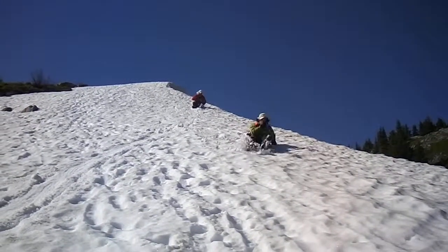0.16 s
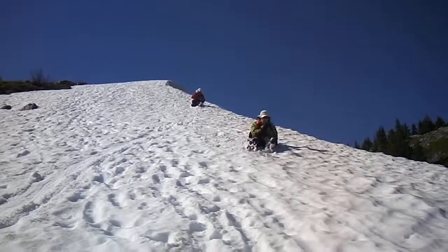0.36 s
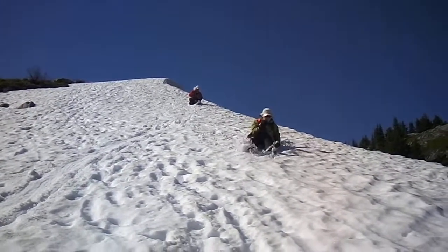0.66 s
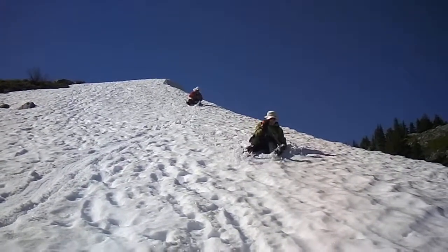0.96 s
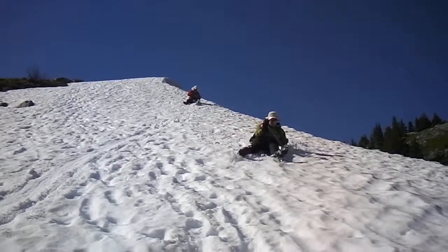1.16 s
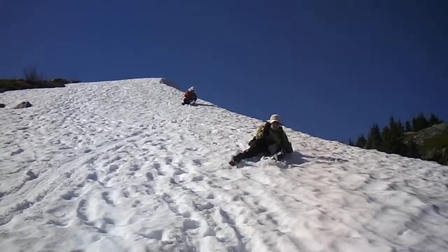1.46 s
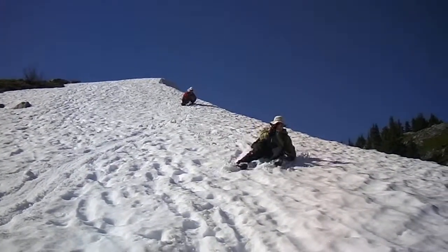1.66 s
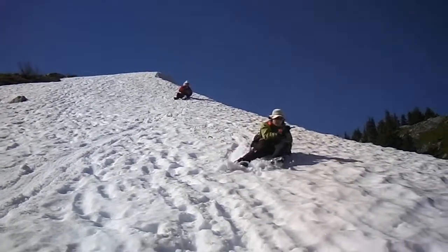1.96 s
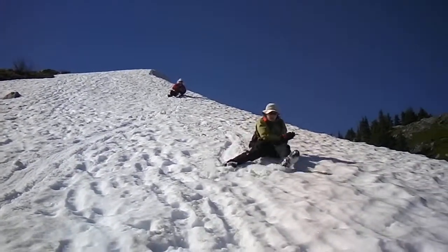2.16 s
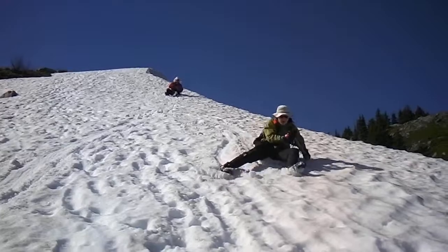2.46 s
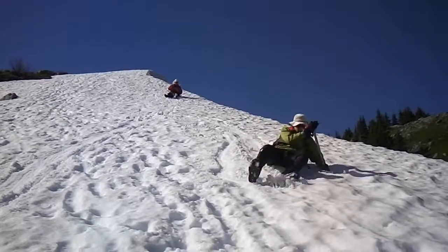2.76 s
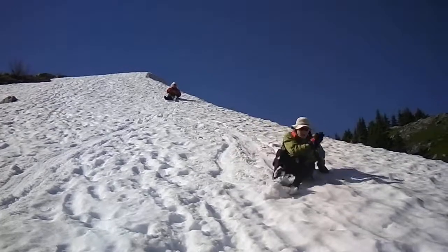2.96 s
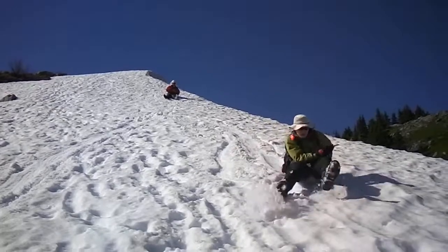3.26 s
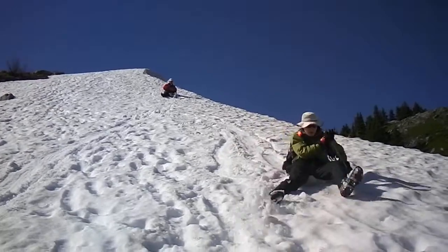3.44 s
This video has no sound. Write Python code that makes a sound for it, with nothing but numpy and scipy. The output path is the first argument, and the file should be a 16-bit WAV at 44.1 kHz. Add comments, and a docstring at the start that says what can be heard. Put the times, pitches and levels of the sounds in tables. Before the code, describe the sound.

A person slides down coarse snow with a grainy hiss, while nylon cloth swishes close by.

```python
"""Sliding down spring snow

A person slides towards a camera: coarse snow grains hiss, thrown crystals patter, a heel crunches in.
Close to the microphone cloth, most likely nylon, swishes: the faster it rubs, the brighter it sounds.
Slow rubbing sticks and slips in short rasps. Light air rumbles on the two microphone ports."""
import sys
import numpy as np
from scipy import signal
from scipy.fft import rfft, irfft, next_fast_len
from scipy.io import wavfile
from scipy.ndimage import uniform_filter1d, map_coordinates

SR = 44100
rng = np.random.default_rng(int(sys.argv[2]) if len(sys.argv) > 2 else 0)


def generate_wav(sig):
    """Save sig (samples, or channels by samples) to the path in sys.argv[1] as 16-bit PCM at SR."""
    pcm = np.round(np.clip(np.atleast_2d(sig).T, -1, 1) * 32767).astype(np.int16)
    wavfile.write(sys.argv[1], SR, pcm)


N = 158760  # 3.6 s


def amp(db):
    """Decibels to gain."""
    return 10 ** (np.asarray(db) / 20)


def unit(x):
    """Scale to rms 1."""
    return x / np.sqrt(np.mean(x ** 2) + 1e-20)


def along(points, hz):
    """Interpolate (frequency [Hz], value) rows on a log axis."""
    knots_hz, values = np.transpose(points)
    return np.interp(np.log(hz + 1), np.log(knots_hz + 1), values)


def lift_db(resonances, hz):
    """Summed bell curves of (centre [Hz], width [Hz], lift [dB]) rows."""
    return sum(db * 0.5 ** ((2 * (hz - centre) / width) ** 2) for centre, width, db in resonances)


def curve(rows):
    """One value per sample from (time [s], value) rows."""
    return np.interp(np.arange(N) / SR, *np.transpose(rows))


def bursts(rows):
    """A rounded swell per (start [s], length [s], level [dB]) row."""
    t = np.arange(N) / SR
    envelope = np.zeros(N)
    for start_s, length_s, db in rows:
        progress = np.clip((t - start_s) / length_s, 0, 1)
        envelope += amp(db) * np.abs(np.sin(np.pi * progress)) ** 0.53
    return envelope


def wobble(knots_per_s):
    """Smooth random curve."""
    return map_coordinates(rng.standard_normal(4000), [np.arange(N) * knots_per_s / SR], mode="wrap")


def filtered(x, response):
    """Apply a complex frequency response."""
    size = next_fast_len(N + 8192)
    hz = np.fft.rfftfreq(size, 1 / SR)
    return irfft(rfft(x, size) * response(hz), size)[..., :N]


def grainy(per_s, spread_db, share):
    """Two independent streams of tiny impacts on noise; share is the impacts' part of the power."""
    hits = (rng.random((2, N)) < per_s / SR) * rng.choice([-1, 1], (2, N))
    sizes = amp(spread_db * np.minimum(rng.exponential(size=(2, N)), 4))
    bed = rng.standard_normal((2, N))
    return np.sqrt(share) * unit(hits * sizes) + np.sqrt(1 - share) * bed


def stereo(pair, spectrum):
    """Colour two streams and mix them to partly alike left and right, rms 1."""
    # left-right likeness (frequency [Hz], correlation [-])
    likeness = [(60, 1), (300, .9), (2000, 0.91), (5000, 0.71), (9000, 1), (14000, 0.54)]

    def response(hz):
        angle = np.arccos(np.clip(along(likeness, hz), -1, 1)) / 2
        return amp(along(spectrum, hz)) * [np.cos(angle), np.sin(angle)]
    mid, side = filtered(pair, response)
    return unit(np.array([mid + side, mid - side]))


def patchy(x, depth_db):
    """Short patches of random gain in time and frequency, rms 1."""
    spectra = signal.stft(x, nperseg=256)[2]
    field = rng.standard_normal(spectra.shape[1:])
    field = uniform_filter1d(field, size=8, axis=0)
    field = uniform_filter1d(field, size=10, axis=1)
    gain = amp(depth_db * unit(field))
    return unit(signal.istft(spectra * gain, nperseg=256)[1][:, :N])


def slide():
    """Snow grains break under the body; bumps in the slope make the hiss uneven."""
    # hiss envelope (time [s], level [dB])
    levels = [(0, -41.5), (.09, -39.5), (.16, -38), (.6, -35.5), (1.2, -35.5), (1.8, -35.5), (1.9, -37),
              (1.97, -35.5), (2.12, -33.5), (2.19, -35), (2.26, -37), (2.38, -34), (2.47, -33.5),
              (2.53, -36), (2.64, -33.5), (2.77, -36.5), (2.9, -35), (2.95, -32.5), (3.06, -34),
              (3.22, -31), (3.31, -33), (3.4, -31), (3.52, -32.5), (3.6, -31.5)]
    # snow spectrum (frequency [Hz], relative density [dB])
    snow = [(40, -50), (90, -34), (150, -12), (250, -6), (450, -2), (1100, -2), (2300, 1.5), (4000, 0.5),
            (6800, -4.5), (10500, -5), (12500, -7.5), (14000, -15), (15200, -30)]
    grains = grainy(per_s=8000, spread_db=3, share=0.35)
    hiss = patchy(stereo(grains, snow), depth_db=1.0)
    return hiss * amp(curve(levels))


def air():
    """Moving air rumbles in lumps, different on each port."""
    # air on the ports (time [s], level [dB])
    levels = [(0, -52), (.08, -57), (.13, -43), (.23, -69), (.35, -54.5), (.52, -55.5), (.65, -67),
              (1.05, -66), (1.14, -49.5), (1.38, -54), (1.51, -47), (1.7, -55.5), (1.83, -50.5),
              (1.93, -69.5), (3.6, -72)]
    # rumble spectrum (frequency [Hz], relative density [dB])
    spectrum = [(20, 10), (50, -1.5), (130, 10), (220, 4), (500, -33), (2000, -60)]
    rumble = filtered(rng.standard_normal((2, N)), lambda hz: amp(along(spectrum, hz)))
    lumps_db = 2.9 * np.tanh([wobble(30.54), wobble(29.5)])
    return unit(rumble * amp(lumps_db)) * amp(curve(levels))


def swish():
    """Threads tick past each other at a rate set by the speed; fixed resonances colour the result."""
    # cloth strokes, one curve each (time [s], speed [m/s], level [dB])
    strokes = [
        [(.12, 2.2, -50), (.16, 1.8, -37), (.18, 1.2, -31.5), (.21, 0.68, -37.5), (.25, 0.67, -43)],
        [(.47, 0.48, -42), (.62, 0.44, -38.5), (.68, 0.58, -32.5), (.73, 0.56, -34.5), (.78, .75, -30.5),
         (.83, 0.64, -31), (.93, 0.88, -28), (1.02, 1.01, -27), (1.08, 1.48, -25), (1.16, 1.8, -28),
         (1.2, 1.33, -25), (1.265, 1.9, -25), (1.295, 1.85, -34), (1.34, 1.44, -33.5), (1.4, 1.6, -37)],
        [(1.405, 2, -40), (1.435, 1.9, -28.5), (1.48, 1.26, -26.5), (1.55, 1.17, -27), (1.59, 1.6, -23.5),
         (1.63, 2, -27), (1.68, 2.2, -23.5), (1.71, 2.3, -24), (1.775, 1.86, -23), (1.808, 1.3, -25.5),
         (1.822, 0.92, -29.5), (1.846, 0.94, -32.5), (1.858, .9, -53)],
        [(2.785, 4.2, -48), (2.812, 1.2, -35), (2.835, 1.35, -30), (2.86, 1.5, -45)],
    ]
    # cloth colour (frequency [Hz], gain [dB])
    cloth = [(100, -25), (400, -0.5), (900, -1.5), (2000, 4), (5000, 1), (7000, -0.5), (8300, 2),
             (10500, 3), (12500, 2.5), (14000, -6.5), (15200, -50)]
    # resonances between cloth and camera body (centre [Hz], width [Hz], lift [dB])
    hollows = [(1050, 140, 3), (1390, 140, 3), (1750, 150, 3), (2140, 220, 4), (2780, 320, 5),
               (3250, 200, 3), (3790, 300, 7.5), (4740, 380, 7), (5600, 260, 4), (6030, 240, 4),
               (6980, 380, 6), (8530, 240, 3.5), (9250, 240, 4), (9630, 240, 3.5), (10480, 400, 4),
               (11620, 240, 2.5)]
    threads_per_m, width_oct = 4090, 0.48
    skirt_below_db, skirt_above_db = -8, -12.5
    ticks = grainy(per_s=8000, spread_db=2.5, share=0.44)
    rub = patchy(stereo(ticks, spectrum=[(20, 0), (20000, 0)]), depth_db=1.15)
    hz, t, spectra = signal.stft(rub, SR, nperseg=512, noverlap=384)
    colour = amp(along(cloth, hz) + lift_db(hollows, hz))
    gain = np.zeros(spectra.shape[1:])
    for stroke in strokes:
        times_s, speed_m_s, db = np.transpose(stroke)
        tick_hz = threads_per_m * np.interp(t, times_s, speed_m_s)
        octaves = np.log2((hz[:, None] + 1) / tick_hz)
        peak_power = np.exp(-0.5 * (octaves / width_oct) ** 2)
        skirt = amp(np.interp(octaves, [-1, 1], [skirt_below_db, skirt_above_db]))
        shape = colour[:, None] * np.sqrt(peak_power + skirt ** 2)
        level = np.interp(t, times_s, amp(db), left=0, right=0)
        gain += shape / np.sqrt(np.mean(shape ** 2, axis=0)) * level
    swishes = signal.istft(spectra * gain, SR, nperseg=512, noverlap=384)[1][:, :N]
    flicker_db = 0.98 * wobble(70)
    return swishes * amp(flicker_db)


def judder():
    """Slowly rubbing cloth sticks and slips in short, hollow rasps."""
    # cloth catches (start [s], length [s], level [dB])
    catches = [(.272, 0.075, -31.5), (.356, 0.026, -34.5), (.392, 0.031, -36.5), (.43, 0.023, -35.5)]
    # rasp spectrum (frequency [Hz], relative density [dB])
    spectrum = [(200, -23), (550, -10), (1100, -5.5), (2100, -0.5), (2900, -1.5), (3400, -22), (6000, -10),
                (12000, -45)]
    # resonances the judder rings (centre [Hz], width [Hz], lift [dB])
    rings = [(565, 65, 9), (736, 90, 10), (1092, 110, 13.5), (1730, 110, 7.5), (2140, 150, 10),
             (2700, 150, 6.5)]
    rasp = stereo(grainy(per_s=1200, spread_db=1, share=0.45), spectrum)
    hollow_rasp = filtered(rasp, lambda hz: amp(lift_db(rings, hz)))
    return unit(hollow_rasp) * bursts(catches)


def spray():
    """Thrown ice crystals, all much the same size, patter back on the crust."""
    # spray as the slider nears (time [s], level [dB])
    levels = [(0, -71), (1.9, -51), (2.86, -47), (2.96, -42), (3.07, -61), (3.2, -47), (3.42, -39.5),
              (3.6, -46)]
    # crystal spectrum (frequency [Hz], relative density [dB])
    crystals = [(1000, -33), (4000, -18), (7000, -5), (10500, 7), (13000, 3), (15200, -16)]
    patter = grainy(per_s=9000, spread_db=1, share=0.45)
    return stereo(patter, crystals) * amp(curve(levels))


def plough():
    """A heel digs into the snow with a darker, coarser crunch."""
    # heel digs (start [s], length [s], level [dB])
    digs = [(3.095, 0.13, -32)]
    # crunch spectrum (frequency [Hz], relative density [dB])
    crunch = [(80, -39), (200, -15), (350, 1.5), (900, 0), (1900, 1), (3200, 1), (5000, -10), (12000, -25)]
    grains = grainy(per_s=2500, spread_db=4, share=0.33)
    return stereo(grains, crunch) * bursts(digs)


def scene():
    """All sources in open air, no echo."""
    return slide() + spray() + plough() + swish() + judder() + air()


def record(dry):
    """The two ports differ in colour and delay; the camera has a narrow notch and a band limit."""
    # port balance (frequency [Hz], left minus right [dB])
    balance = [(100, 1), (1000, 1.1), (3300, 0), (5500, -1), (7500, -4.5), (9100, -7), (11000, -6),
               (13000, 0)]
    # port phase (frequency [Hz], left lead [rad])
    phase = [(100, -0.25), (1000, -0.25), (3700, -0.3), (5000, -0.82), (7400, -1.26), (9560, -1.23),
             (12000, -.2)]
    notch_hz, notch_width_hz, top_hz = 7890, 430, 15150

    def response(hz):
        sides = np.array([[0.5], [-0.5]])
        ports = amp(sides * along(balance, hz)) * np.exp(1j * sides * along(phase, hz))
        detuning = notch_hz ** 2 - hz ** 2
        notch = detuning / (detuning + 1j * hz * notch_width_hz)
        return ports * notch * (hz < top_hz)
    return filtered(dry, response)


dry = scene()
out = record(dry)
generate_wav(out)
```